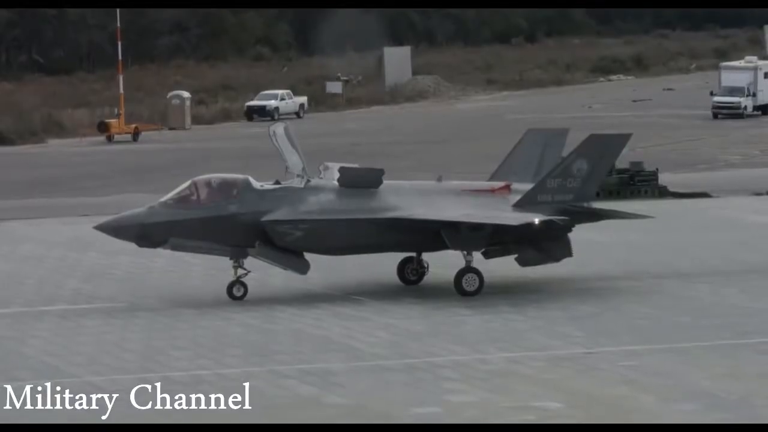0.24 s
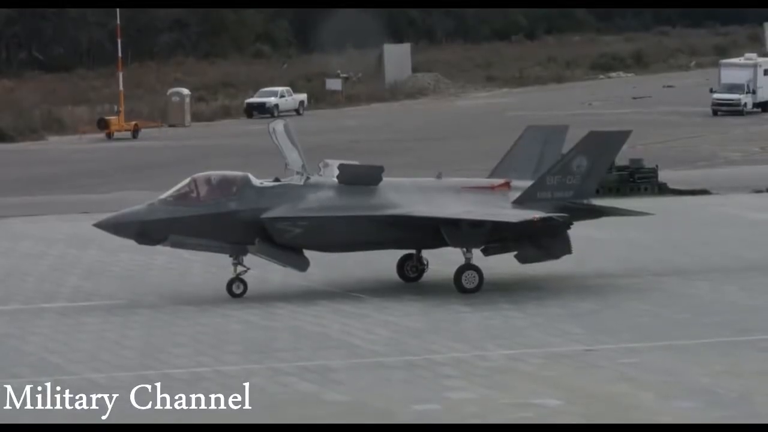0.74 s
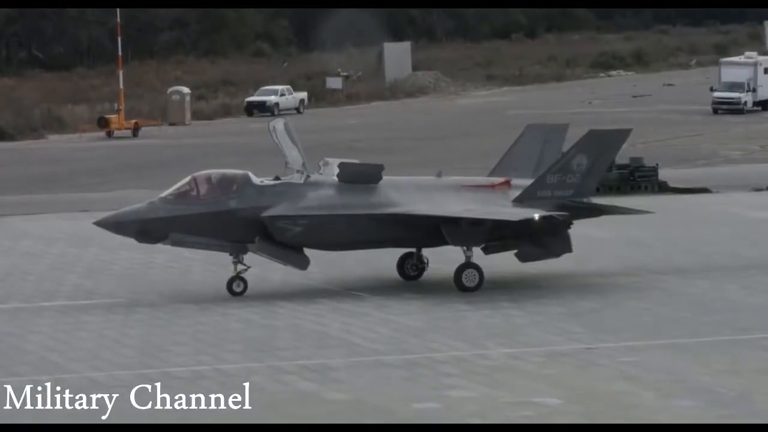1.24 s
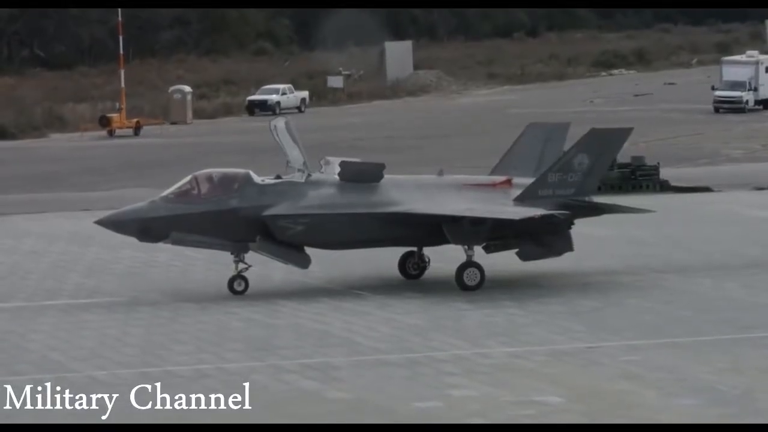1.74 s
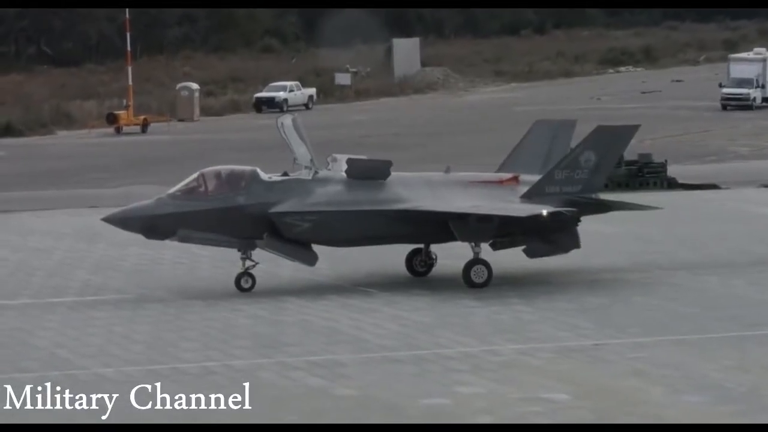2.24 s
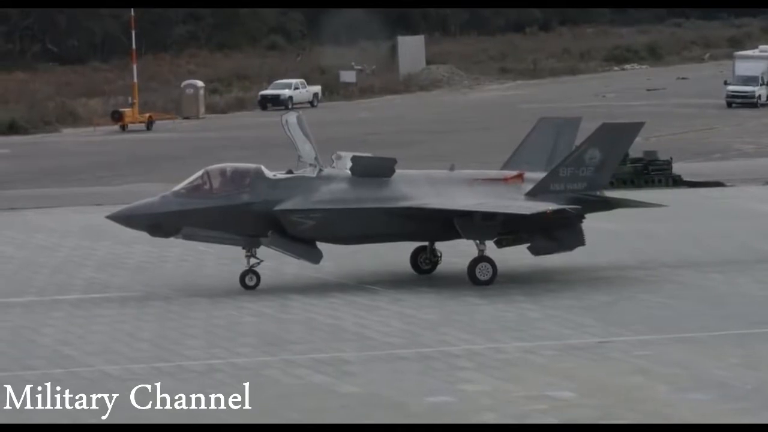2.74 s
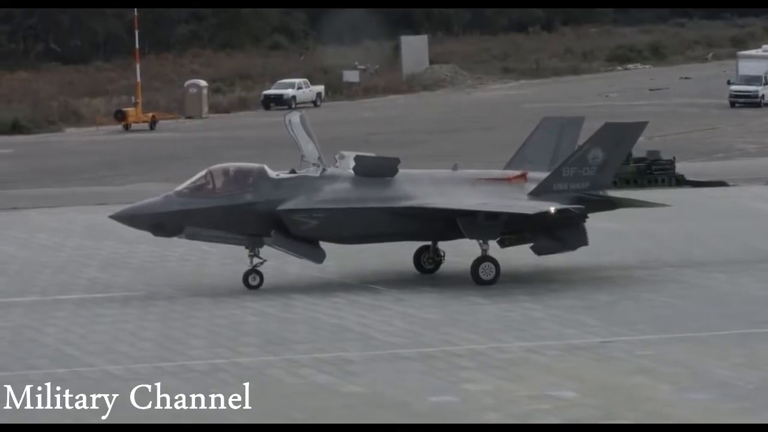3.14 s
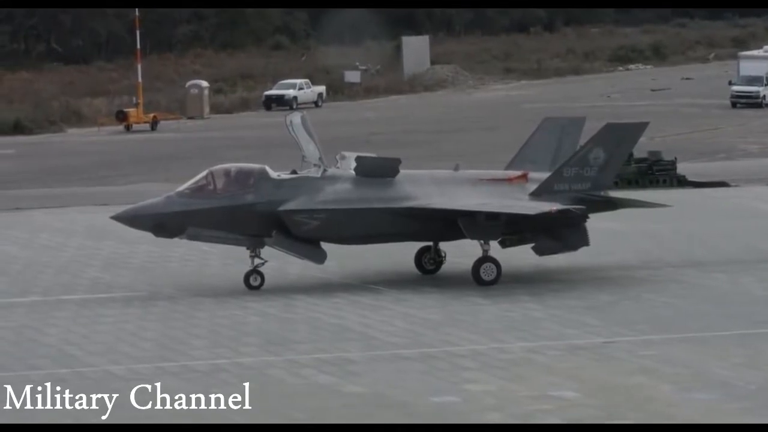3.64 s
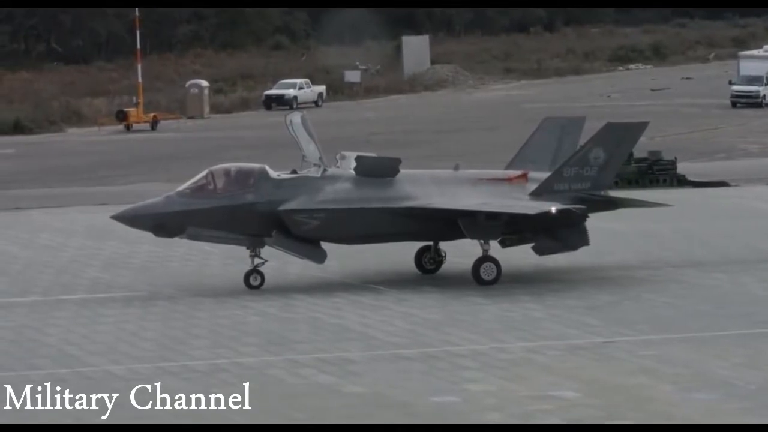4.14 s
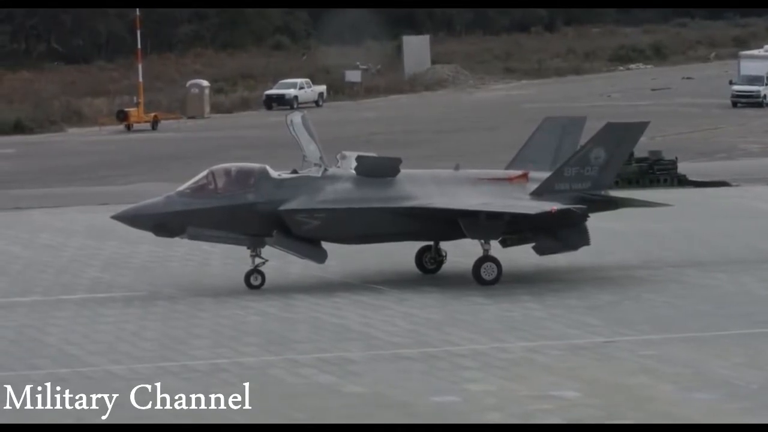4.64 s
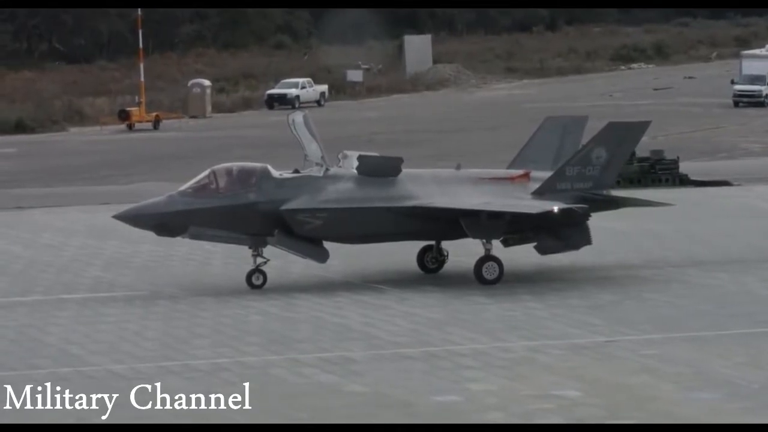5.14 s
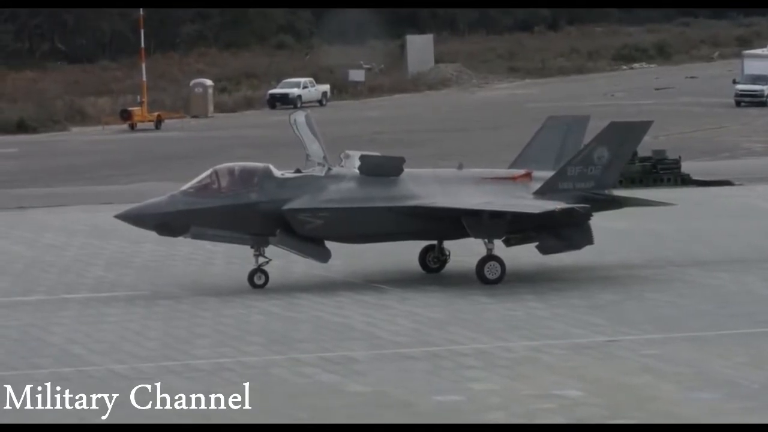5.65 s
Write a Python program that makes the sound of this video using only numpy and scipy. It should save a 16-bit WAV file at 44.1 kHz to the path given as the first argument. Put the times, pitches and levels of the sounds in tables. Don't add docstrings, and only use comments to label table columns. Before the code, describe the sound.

Shrill turbine whine holds, climbs for three seconds, then levels off as hissing jet noise fills in, outdoors, right channel only.

```python
import sys
import numpy as np
from scipy import signal
from scipy.io import wavfile
from scipy.ndimage import uniform_filter1d

SR = 44100
rng = np.random.default_rng(int(sys.argv[2]) if len(sys.argv) > 2 else 0)


def put_to_file(sound):
    columns = np.atleast_2d(sound).T
    safe = np.clip(columns, -1, 1)
    whole_steps = np.round(safe * 32767)
    wavfile.write(sys.argv[1], SR, whole_steps.astype(np.int16))


N = 260631
HOP = 256

# time_s, first_row_blade_rate_hz
SHAFT_SPOOL = [(0.0, 1395.8), (0.5, 1396.6), (0.75, 1410.1), (1.0, 1464.0), (1.25, 1536.5), (1.5, 1617.6),
               (2.0, 1793.0), (2.5, 1964.7), (2.75, 2042.0), (3.0, 2115.9), (3.25, 2175.9), (3.5, 2220.5),
               (3.75, 2248.2), (4.0, 2258.3), (4.25, 2257.6), (5.0, 2240.4), (5.91, 2220.5)]
# time_s, fan_tone_sevenths
FAN_GEAR = [(0, 6.8), (3, 6.8), (5.9, 6.83)]
LOADS = [0, .5, 1]

STRONG_TONES = {"6": (-69.5, -63, -57.5, 0.1466), "7": (-67.5, -52, -57, 0.1045),
                "12": (-85, -52, -60.5, 0.1219), "13": (-62.5, -46, -66.5, 0.12),
                "14": (-52.5, -43.5, -50, 0.1327), "19": (-63, -53.5, -56.5, 0.1146),
                "21": (-61.5, -56.5, -50, 0.1114), "fan": (-69.5, -62.5, -61.5, 0.1293)}
ROW_ONE_GLINTS = {"7": [(.93, 7), (1.35, 7), (1.54, 10.5), (1.67, -3), (1.8, 2), (1.97, 4), (2.41, 6),
                  (2.6, 2), (2.89, 10.5), (3.15, 9.5), (3.41, 10), (3.71, 14.5), (3.92, 13), (4.26, 16.5),
                  (4.45, 11), (4.66, 10), (4.86, 9), (5.33, 8)]}
THIRD_HARMONIC_GLINTS = {"21": [(.2, 12), (.67, 9.9), (.93, 7), (1.07, 9), (1.2, 8), (1.35, 10), (1.48, 12),
                         (1.65, 10), (1.85, 8), (2.2, 8), (2.41, 11), (2.56, 8), (2.71, 7.3), (2.96, 12),
                         (3.08, 8.3), (3.23, 11), (3.57, 12.4), (3.71, 13), (4.4, 11), (4.82, 5),
                         (5.22, 11), (5.66, 4.3), (5.85, 7.5)]}
ROW_TWO_GLINTS = {"6": [(.76, 6), (1.7, 8), (1.83, 8.5), (1.97, 15.4), (2.31, 8.2), (2.43, 8.3),
                  (3.03, 11.6), (3.36, 12), (3.62, 12), (3.86, 11), (4.2, 11), (4.43, 10), (4.63, 18),
                  (5.1, 6), (5.31, 12.7), (5.8, 9)], "12": [(.93, 16), (1.11, 16), (2.08, 8.8),
                  (2.36, 14.5), (2.54, 17.2), (2.75, 12), (2.9, 9.8), (3.06, 14), (3.36, 19.4), (3.62, 23),
                  (3.86, 12), (4.43, 13), (4.78, 12), (4.99, 20.5), (5.24, 12), (5.6, 7.2)]}
SUM_TONE_GLINTS = {"13": [(.43, 7), (.94, 9.2), (1.45, 9.4), (1.65, 13.4), (2.02, 3.3), (2.3, 5.3),
                   (2.96, 17), (3.21, 10), (3.7, 22), (4.0, 7), (4.22, 12), (4.81, 8), (5.05, 17),
                   (5.41, 7.1), (5.77, 14)], "19": [(0, 9.8), (1.45, 9), (1.65, 13), (2.25, 12),
                   (2.37, 13.6), (2.72, 14), (2.84, 8), (3.02, 11), (3.5, 6.5), (3.68, 12), (4.0, 6.4),
                   (4.22, 8.6), (4.81, 11), (5.05, 12), (5.17, 6), (5.41, 11), (5.8, 8.7)]}
# time_s, lift_db
SECOND_HARMONIC_GLINTS = [(.55, 9.3), (.7, 5.6), (.85, 3.4), (.93, 3), (1.06, 10), (1.19, 0), (1.48, 7.5),
                          (1.65, 9.8), (1.83, 9.3), (2.03, 13.2), (2.2, 5), (2.38, 8), (2.76, 2),
                          (3.08, 14), (3.23, 6), (3.37, 6.5), (3.51, 6), (3.7, 6), (3.79, 11), (3.92, 5.5),
                          (4.2, 4), (4.33, 5), (4.42, 11), (4.58, 6), (4.68, 13), (4.85, 6), (5.03, 6),
                          (5.24, 6.7), (5.66, 9.5), (5.85, 10.5)]
# time_s, lift_db
FAN_GLINTS = [(.81, 12), (1.26, 10), (1.74, 9.1), (2.15, 4.8), (2.3, 7), (2.45, 10), (2.58, 8), (2.72, 11),
              (3.05, 6), (3.36, 12), (3.75, 16), (4.29, 12), (4.63, 15), (4.86, 15.4), (5.31, 10),
              (5.56, 7.6), (5.75, 5.9)]
# time_s, share
SCATTER = [(0, 0.12), (1.9, 0.28), (2.3, 0.81), (2.8, 1.2), (3.1, 0.18), (3.6, 0.47), (5.9, 0.21)]
FAINT_SEVENTHS = [8, 15, 18, 20, 25, 26, 27, 28, 40, 32, 33, 35, 42]
FAINT_LOADS = [0, .38, .65, 1]
FAINT_LEVELS = [(-71, -68, -65, -59), (-74, -63, -60, -55), (-64, -59, -57, -54), (-69, -56, -57, -60),
                (-66, -62, -61, -62), (-67, -52, -59, -65), (-74, -62, -67, -71), (-63, -56, -59, -65),
                (-80, -66, -69, -78), (-78, -63, -67, -78), (-78, -57, -61, -73), (-76, -63, -66, -71),
                (-77, -74, -75, -79)]
# pitch_sevenths, level_db
CORE_WHISTLES = [(7.64, -69), (17.56, -70), (19.75, -61)]

# frequency_hz, density_db_per_hz
INTAKE_SPECTRUM = [(1500, -31), (3000, -28), (4500, 4.5), (6000, 5), (7500, -7), (9000, -6), (11000, -23),
                   (13000, -50)]
INTAKE_DB = -50

# frequency_sevenths, density_db_per_hz
BLADE_SPECTRUM = [(2, -72), (3.5, -49), (5, -21.5), (6.8, -13.5), (7.6, -17.5), (10, -12), (13.6, -6),
                  (15, -8.5), (17, -10.5), (20.5, -5), (22, -15), (27.5, -14), (29, -19.5), (36, -23),
                  (46, -34)]
# idle_db, half_load_db, full_load_db
BLADE_DB = (-43, -34.5, -33)
# time_s, lift_db
SURGES = [(.92, 2.5), (1.25, -1.5), (2.35, 1.5), (2.8, 2), (3.2, -3), (3.7, 1.5), (4.15, 0), (4.9, 1),
          (5.1, 1.5), (5.6, -4)]
SURGE_S = 0.22

# frequency_hz, density_db_per_hz
ROAR_SPECTRUM = [(15, -57), (25, -25), (96, 0), (146, -0.5), (477, 2), (517, 0), (840, -2.5), (941, -8),
                 (1200, -7), (1560, -2), (2640, -120)]
# idle_db, half_load_db, full_load_db
ROAR_DB = (-61, -59.5, -56)
THROTTLE_S, THROTTLE_RISE_S, THROTTLE_DB = 0.82, .08, 4

# frequency_hz, density_db_per_hz
HISS_SPECTRUM = [(3000, -66), (5500, 0), (7500, -3), (9000, -4.5), (10500, -7), (12000, -13), (13500, -17),
                 (15000, -21.5)]
# idle_db, half_load_db, full_load_db
HISS_DB = (-67.5, -50, -61)
# time_s, lift_db
GUSTS = [(.31, 5), (.79, 7), (.92, 4), (1.45, 3.5), (1.68, 2), (2.04, 0), (2.3, 3.5), (2.5, 3.5), (2.85, 4),
         (3.07, 6), (3.23, -3), (3.33, 6), (3.57, 11), (3.72, 12), (4.39, 8), (4.5, 10), (4.69, 9.5),
         (5.1, 12), (5.23, 10), (5.4, -3), (5.6, 2), (5.72, 9), (5.82, 5.5), (5.91, 10)]
GUST_S, GUST_ON_BLADES = 0.092, 0.1

# time_s, level_db
JET_LEVEL = [(0, -48.5), (1.5, -50), (2.5, -47), (3.2, -41.5), (3.7, -37.5), (4.5, -35.5), (5.2, -37.5),
             (5.9, -36.5)]
# frequency_hz, density_db_per_hz
MIXING_SPECTRUM = [(200, -60), (600, -8), (1000, -3.5), (1600, 1), (3000, 3), (5000, 4), (7000, -1.5),
                   (9000, -8.5), (14000, -45)]

# time_s, lift_db
CRACKLES = [(1.45, 8), (2.06, 9), (2.34, 12), (2.45, 9), (2.55, 12), (2.9, 9), (3.08, 12), (3.5, 10),
            (3.72, 17), (4.39, 16), (4.48, 11), (4.65, 14), (4.83, 10), (5.23, 18), (5.75, 11)]
# idle_db, half_load_db, full_load_db
CRACKLE_DB = (-75, -67, -66)
CRACKLE_S = .045
# frequency_hz, density_db_per_hz
CRACKLE_SPECTRUM = [(7000, -40), (10000, -4), (11500, 2), (13500, -3), (15000, -5)]

# time_s, slope_db_per_khz (above 11 kHz)
TOP_DULLNESS = [(0, -2.2), (.7, -2.4), (1.1, -3), (1.7, -1.6), (2.2, -.3), (5.9, 0)]
TOP_BANDS_HZ = [11700, 12400, 13100, 13800, 14450, 15050]
DROP_DB = -59.3


def amp(db):
    return 10 ** (np.asarray(db) / 20)


def curve(table, s):
    at, *columns = np.transpose(table)
    return [np.interp(s, at, column) for column in columns]


def at_load(load, levels_db):
    return np.interp(load, LOADS, levels_db)


def lifts(rows, s, half_s):
    return sum(db * np.maximum(1 - np.abs(s - at) / half_s, 0) for at, db in rows)


def walk(rate, size=N, per_s=SR):
    hold = max(int(per_s / rate), 1)
    steps = rng.standard_normal(size=4096)
    held = steps[np.arange(size) // hold % 4096]
    smooth = uniform_filter1d(uniform_filter1d(held, hold), hold)
    return smooth / np.std(smooth)


def tone(turns, db, hz, fade_db=4.0, blur=.6, blur_hz=129.8):
    drift = .55 * hz / 4000
    steady = amp(db + fade_db * walk(75.)) * np.exp(1j * drift * walk(40.))
    eddies = (walk(blur_hz) + 1j * walk(blur_hz)) / np.sqrt(2)
    skirt = blur * amp(uniform_filter1d(db, SR // 8)) * eddies
    carrier = np.exp(2j * np.pi * (turns + rng.random()))
    return np.sqrt(2) * np.imag((steady + skirt) * carrier)


def noise(spectrum, db, unit_hz=0.97, swell_db=1., flicker_db=1.):
    hz, s, cells = signal.stft(rng.standard_normal(N), SR, nperseg=4 * HOP, noverlap=3 * HOP)
    unit = np.interp(s, np.arange(N) / SR, unit_hz * np.ones(N))
    place = np.log(np.maximum(hz, 1)[:, None] / unit)
    at, density_db = np.transpose(spectrum)
    gain = amp(np.interp(place, np.log(at), density_db))
    gain = gain / np.sqrt(np.mean(gain ** 2, axis=0))
    thirds = 3 * np.log2(np.maximum(hz, 20) / 20)
    flicker = np.array([walk(12., size=len(s), per_s=SR / HOP) for _ in range(int(thirds[-1]) + 2)])
    low = thirds.astype(int)
    share = (thirds - low)[:, None]
    wander_db = flicker_db * ((1 - share) * flicker[low] + share * flicker[low + 1])
    wander_db = wander_db + swell_db * walk(22., size=len(s), per_s=SR / HOP)
    air = signal.istft(cells * gain * amp(wander_db), SR, nperseg=4 * HOP, noverlap=3 * HOP)[1][:N]
    return air * amp(db)


def strong_level(name, glints, s, load):
    *levels_db, half_s = STRONG_TONES[name]
    return at_load(load, levels_db) + lifts(glints, s, half_s)


def blade_whistles(s, turns, seventh_hz, load):
    glints = {**ROW_ONE_GLINTS, **THIRD_HARMONIC_GLINTS, **ROW_TWO_GLINTS, **SUM_TONE_GLINTS}
    out = np.zeros(N)
    for name in sorted(glints, key=int):
        k = int(name)
        db = strong_level(name, glints[name], s, load)
        out += tone(k * turns, db, k * seventh_hz, fade_db=2.2, blur=.4, blur_hz=150.)
    second_db = strong_level("14", SECOND_HARMONIC_GLINTS, s, load)
    scatter = curve(SCATTER, s)[0]
    return out + tone(14 * turns, second_db, 14 * seventh_hz, fade_db=3., blur=scatter, blur_hz=260.)


def fan_whistle(s, seventh_hz, load):
    hz = curve(FAN_GEAR, s)[0] * seventh_hz
    turns = np.cumsum(hz) / SR
    db = strong_level("fan", FAN_GLINTS, s, load)
    return tone(turns, db, hz, blur=0.14) + tone(2 * turns, db - 2.5, 2 * hz, blur=0.43, blur_hz=86.6)


def faint_whistles(turns, seventh_hz, load):
    out = np.zeros(N)
    for k, levels_db in zip(FAINT_SEVENTHS, FAINT_LEVELS):
        db = np.interp(load, FAINT_LOADS, levels_db) - k / 40
        out += tone(k * turns, db, k * seventh_hz, fade_db=4., blur=.5)
    return out


def core_whistles(s, turns, seventh_hz):
    sink_db = np.interp(s, [1.2, 1.8], [0, -30])
    return sum(tone(k * turns, db + sink_db, k * seventh_hz, blur=.4) for k, db in CORE_WHISTLES)


def whine(s, seventh_hz, load):
    turns = np.cumsum(seventh_hz) / SR
    out = blade_whistles(s, turns, seventh_hz, load)
    out += fan_whistle(s, seventh_hz, load)
    out += faint_whistles(turns, seventh_hz, load)
    return out + core_whistles(s, turns, seventh_hz)


def intake_rush():
    return noise(INTAKE_SPECTRUM, INTAKE_DB, swell_db=.6, flicker_db=1.5)


def blade_noise(s, seventh_hz, load, gust_db):
    db = at_load(load, BLADE_DB) + GUST_ON_BLADES * gust_db + lifts(SURGES, s, SURGE_S)
    return noise(BLADE_SPECTRUM, db - 4.0, unit_hz=seventh_hz, swell_db=0.72, flicker_db=0.4)


def engine_roar(s, load):
    throttle = np.clip((s - THROTTLE_S) / THROTTLE_RISE_S, 0, 1)
    db = at_load(load, ROAR_DB) + THROTTLE_DB * throttle
    stretch = np.interp(s, [1.8, 2.8], [1.25, 1.])
    return noise(ROAR_SPECTRUM, db + .5, unit_hz=stretch, swell_db=0.66, flicker_db=0.5)


def air_hiss(load, gust_db):
    return noise(HISS_SPECTRUM, at_load(load, HISS_DB) + gust_db + 5.5, swell_db=.8, flicker_db=1.)


def jet_mixing(s):
    return noise(MIXING_SPECTRUM, curve(JET_LEVEL, s)[0], swell_db=.4, flicker_db=.7)


def jet_crackle(s, load):
    db = at_load(load, CRACKLE_DB) + lifts(CRACKLES, s, CRACKLE_S)
    return noise(CRACKLE_SPECTRUM, db, swell_db=2.5, flicker_db=1.5)


def scene():
    s = np.arange(N) / SR
    seventh_hz = curve(SHAFT_SPOOL, s)[0] / 7
    load = (seventh_hz - seventh_hz.min()) / np.ptp(seventh_hz)
    gust_db = lifts(GUSTS, s, GUST_S)
    air = engine_roar(s, load)
    air += blade_noise(s, seventh_hz, load, gust_db)
    air += jet_mixing(s)
    air += intake_rush()
    air += air_hiss(load, gust_db)
    air += whine(s, seventh_hz, load)
    air += jet_crackle(s, load)
    return np.array([np.zeros(N), 2 * air])


def record(dry):
    hz, s, cells = signal.stft(dry, SR, nperseg=2048, noverlap=1024)
    khz_above = np.maximum(hz / 1000 - 11, 0)
    cells *= amp(np.outer(khz_above, curve(TOP_DULLNESS, s)[0]))
    power = np.abs(cells) ** 2
    for low, high in zip(TOP_BANDS_HZ, TOP_BANDS_HZ[1:]):
        band = (hz >= low) & (hz < high)
        kept = power[:, band].mean(axis=1) > amp(2 * DROP_DB) * power.sum(axis=1)
        cells[:, band] *= kept[:, None]
    cells[:, hz >= TOP_BANDS_HZ[-1]] = 0
    return signal.istft(cells, SR, nperseg=2048, noverlap=1024)[1][:, :N]


dry = scene()
out = record(dry)
put_to_file(out)
```